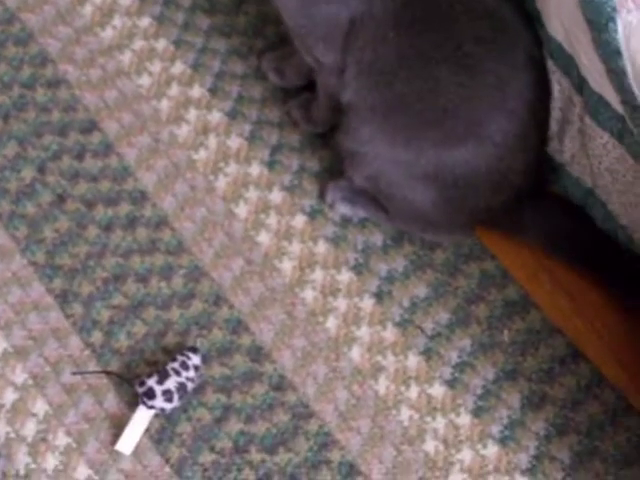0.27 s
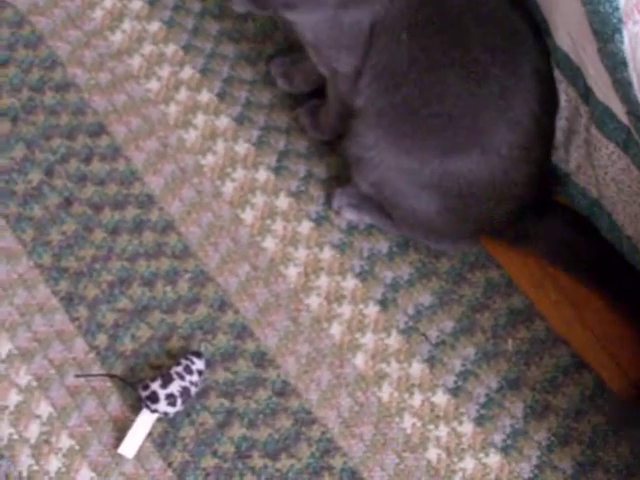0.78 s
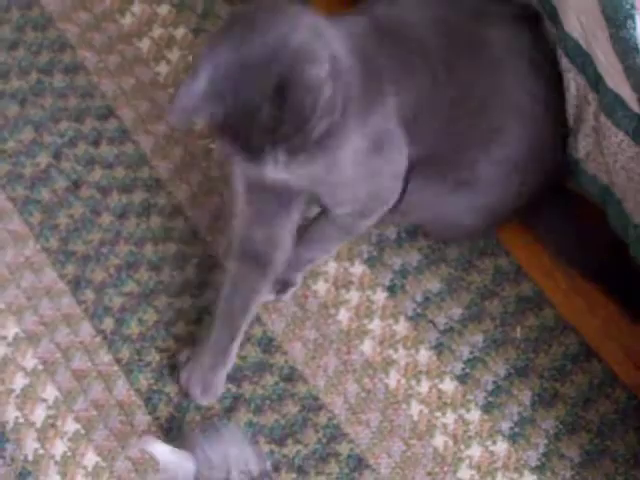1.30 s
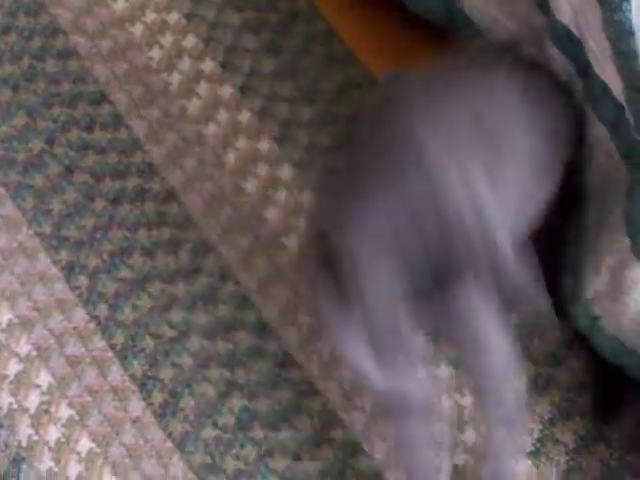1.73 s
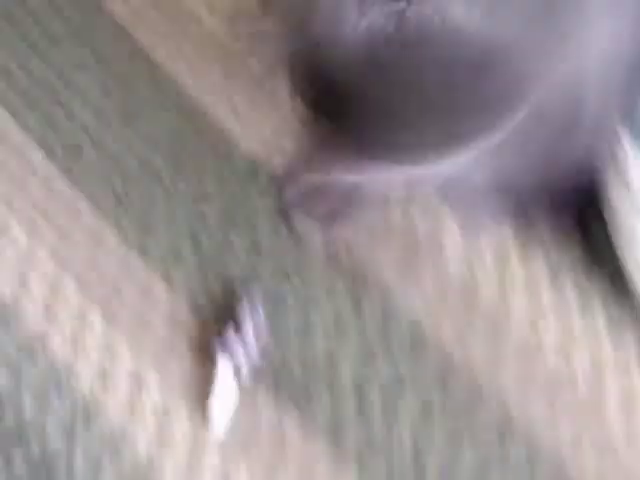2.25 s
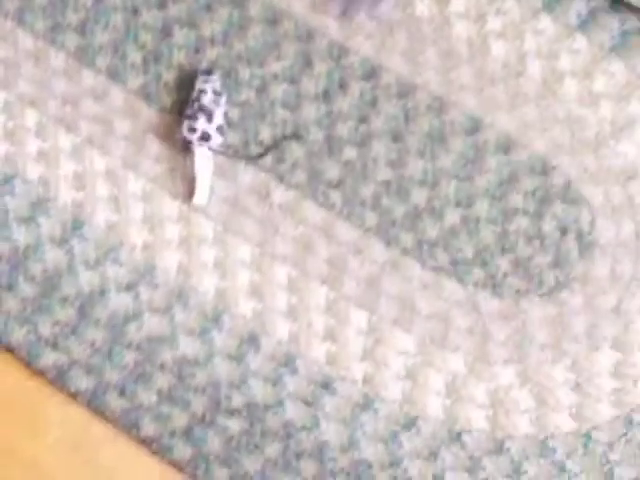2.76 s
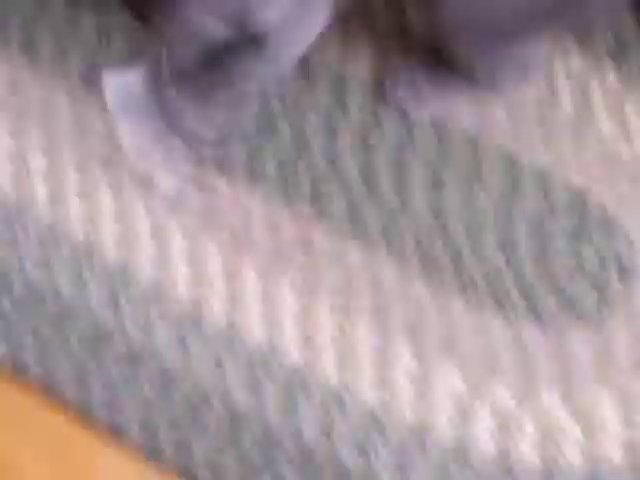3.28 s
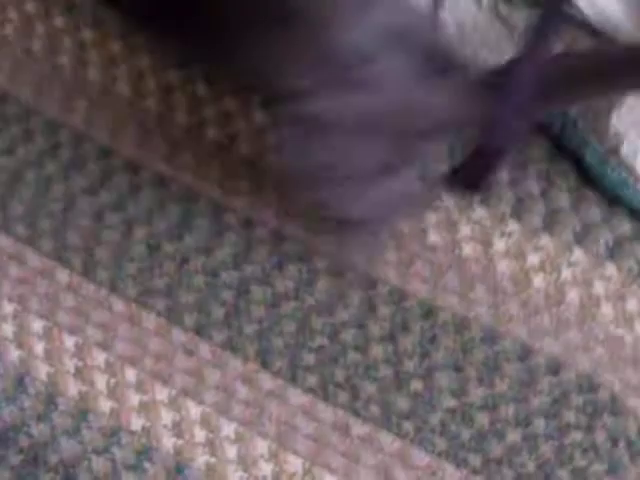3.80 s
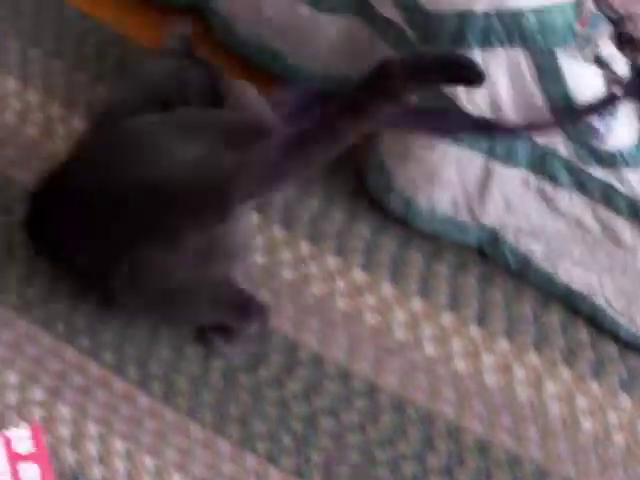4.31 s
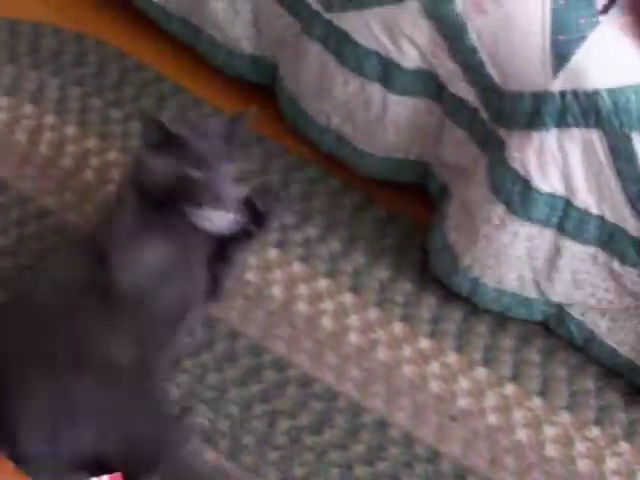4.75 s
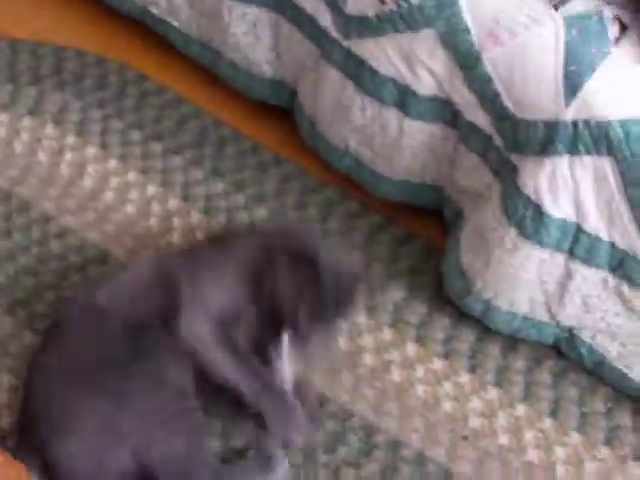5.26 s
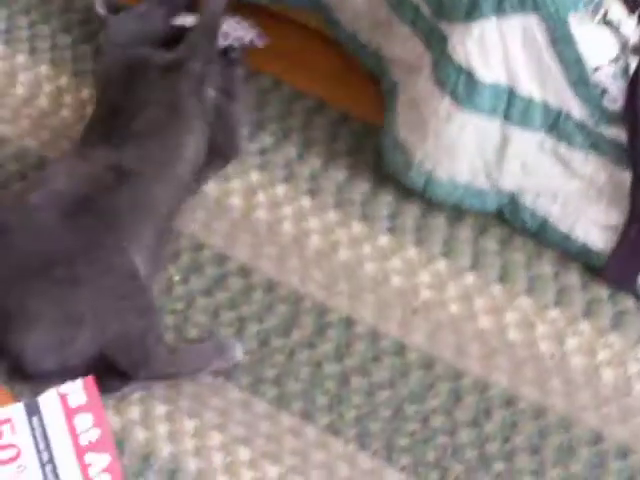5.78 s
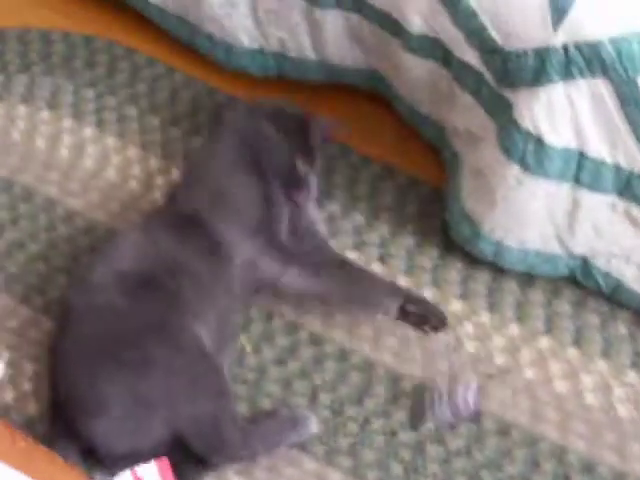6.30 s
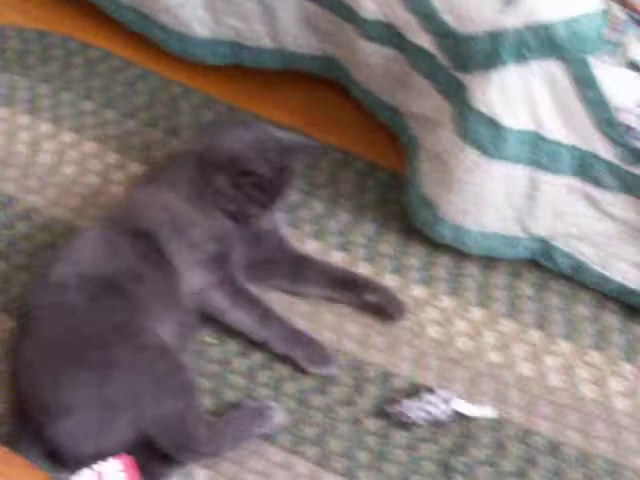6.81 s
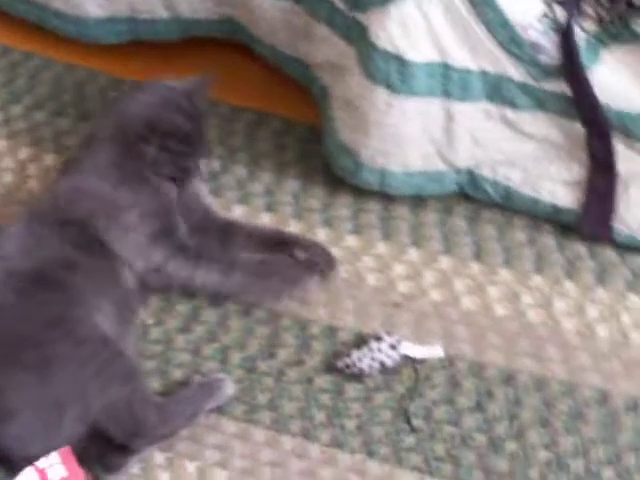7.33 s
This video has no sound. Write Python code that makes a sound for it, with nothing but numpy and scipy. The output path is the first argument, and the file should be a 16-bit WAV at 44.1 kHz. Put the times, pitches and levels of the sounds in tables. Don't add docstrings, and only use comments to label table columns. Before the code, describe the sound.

Close to a small microphone in a furnished bedroom, a cat plays on a braided rug. Faint ticks and soft brushing come first, then claw plucks, scuffs and light thumps on the wooden floor. The toy is struck in a burst of hard, short rattling clacks, the loudest clipping harshly. Afterwards only a few scratches and soft pats remain over low hiss and a faint drone.

```python
import sys
import numpy as np
from scipy import signal
from scipy.fft import rfft, irfft, next_fast_len
from scipy.io import wavfile
from scipy.ndimage import uniform_filter1d, map_coordinates

SR = 44100
rng = np.random.default_rng(int(sys.argv[2]) if len(sys.argv) > 2 else 0)


def master(y):
    cut = np.clip(np.atleast_2d(y).T, -1, 1)
    pcm = np.round(cut * 32767)
    wavfile.write(sys.argv[1], SR, pcm.astype(np.int16))


def nominal_scale(level):
    x = np.asarray(level, float) / 20
    return 10 ** x


N = 332514


def unit(x):
    return x / np.sqrt(np.mean(x ** 2) + 1e-20)


def top1(x):
    return x / np.abs(x).max()


def along(points, hz):
    point_hz, value = np.transpose(points)
    return np.interp(np.log(hz + 1), np.log(point_hz + 1), value)


def curves(rows):
    s, *columns = np.transpose(rows)
    return [np.interp(np.arange(N) / SR, s, column) for column in columns]


def wobble(rate):
    return map_coordinates(rng.standard_normal(N // 20), [np.arange(N) * rate / SR])


def filtered(x, response):
    size = next_fast_len(x.shape[-1] + 4096)
    spectrum = rfft(x, size) * response(np.fft.rfftfreq(size, 1 / SR))
    return irfft(spectrum, size)[..., :x.shape[-1]]


def peak(hz, centre_hz, width_hz):
    return 1j * hz * width_hz / (centre_hz ** 2 - hz ** 2 + 1j * hz * width_hz)


def add(track, s, x):
    track[round(s * SR):][:len(x)] += x


def patchy(depth_db):
    z = signal.stft(rng.standard_normal(N + 512), nperseg=256)[2]
    field = uniform_filter1d(rng.standard_normal(z.shape), 5, 0)
    field = uniform_filter1d(field, 10, 1)
    return signal.istft(z * nominal_scale(depth_db * unit(field)), nperseg=256)[1][:N]


# hz, level_db
BAND_RESPONSE = [(20, -3.5), (6200, -0.5), (7000, -2.5), (7800, -10.5), (8500, -19.5), (9000, -32.5),
                 (9500, -100)]


def narrow_band(hz):
    return nominal_scale(along(BAND_RESPONSE, hz))


# start_s, peak_db, centre_hz
THREAD_TICKS = [(.2554, -34.5, 2830), (.4937, -30.5, 4750), (1.428, -36, 4460), (3.951, -26, 8200),
                (4.0283, -19, 8100), (4.078, -20, 8400), (4.335, -14.5, 4480), (6.875, -45, 6400)]
# start_s, peak_db, centre_hz
THREAD_CRACKS = [(2.1717, -8.5, 3480), (2.1745, -14, 2380), (2.1814, -12.5, 3620), (3.7222, -22, 5260),
                 (3.852, -18, 3630), (7.0147, -29.5, 3050)]
# start_s, peak_db, centre_hz
LOOP_PLUCKS = [(1.372, -22, 4270), (1.3757, -20.5, 4160), (1.4616, -21.5, 4300), (1.624, -26, 3550),
               (1.727, -31, 4000), (2.39, -40, 3530), (3.445, -33, 4460), (3.113, -25, 4140),
               (3.177, -16.5, 4330), (3.5847, -18.5, 3020), (3.597, -33, 3300), (3.6313, -24.5, 4100),
               (5.552, -37.5, 6300), (5.872, -38, 5200), (6.1752, -23, 4000), (6.343, -23, 3470)]
# start_s, peak_db, centre_hz
STRAND_SNAGS = [(1.4758, -26, 4460), (1.4782, -19, 4540), (1.8961, -20.5, 4000), (1.8987, -12.5, 4450),
                (1.9088, -27, 3790), (2.5011, -32.5, 4230), (2.728, -17, 2320), (2.912, -31, 3130),
                (3.1617, -23.5, 4020), (3.1864, -26, 4370), (3.5696, -37, 4030), (3.6164, -26, 3640),
                (3.8995, -27.5, 3700), (3.9061, -19.5, 4200), (4.0196, -5.5, 2530), (4.0902, -20, 3150),
                (4.4, -32.5, 3420), (5.6084, -23.5, 4670), (5.62, -26, 4060), (5.6401, -20, 5300),
                (6.3565, -38, 3440), (6.8734, -35, 4430)]
# start_s, peak_db, centre_hz
CLAW_TEARS = [(2.8943, -29, 3550), (3.0074, -25, 2180), (3.0109, -21.5, 2720), (3.3333, -18, 3290),
              (3.833, -31, 3180), (3.943, -41, 2570), (3.9503, -15, 3330), (3.9569, -20, 2800),
              (4.1265, -38, 2290), (4.67, -26, 4500), (5.6358, -24, 4070), (5.644, -25, 3750),
              (5.6603, -21, 4300), (5.7102, -25.5, 4080), (5.8961, -32, 2620), (5.9308, -30.5, 4700),
              (6.3737, -25.5, 5300)]
# start_s, peak_db, centre_hz
CLAW_SLAPS = [(.2379, -36.5, 1700), (2.1129, -34.5, 1450), (2.7302, -25.5, 1780), (3.215, -24.5, 3180),
              (3.3383, -20, 2740), (4.0161, -14, 2940), (4.243, -34, 1700), (4.3706, -20.5, 1960),
              (4.51, -31.5, 1470), (4.5396, -32.5, 1580), (5.7982, -42, 2760), (6.5024, -29, 2970),
              (7.016, -33, 1270)]
# start_s, peak_db, centre_hz, spread_octaves, t60_s
PAD_PATS = [(.497, -45.5, 4950, 0.083, 0.17), (1.853, -40.5, 2500, 0.19, 0.021),
            (1.891, -36, 4000, 0.44, 0.032), (2.163, -24.5, 3040, 0.47, 0.029),
            (2.6908, -39.5, 3400, 0.4, .07), (3.723, -37, 830, 0.4, 0.14), (4.171, -27.5, 1910, .3, 0.033),
            (4.337, -18, 1900, .55, 0.062), (4.7918, -27.5, 2620, 1, 0.024), (6.093, -38, 3100, 0.33, .05),
            (4.225, -34.5, 4700, .15, .12), (6.504, -41.5, 1100, 0.65, .06), (7.38, -50.5, 6600, .02, .15)]


def claws():
    # spread_octaves, t60_s, pad_knock_db
    kinds = [
        (THREAD_TICKS, (0.091, 0.008, -40)),
        (THREAD_CRACKS, (0.38, 0.0021, -10.5)),
        (LOOP_PLUCKS, (0.29, 0.0046, -30)),
        (STRAND_SNAGS, (0.51, 0.0077, -24)),
        (CLAW_TEARS, (1, 0.0073, -16.5)),
        (CLAW_SLAPS, (0.35, 0.01, -6.5)),
        (PAD_PATS, (-8.5,)),
    ]
    rows = [tuple(row) + shared for table, shared in kinds for row in table]
    out, t = np.zeros(N + SR), np.arange(2048) / SR
    rise = 1 - np.exp(-t / 0.00015)
    release = 5.5 * (np.arange(len(t)) == 12)
    for s, db, hz, spread, t60, knock_db in rows:
        crackle, thud = rng.standard_normal((2, len(t)))
        crackle = crackle * rise * nominal_scale(-60 * t / (1.84 * t60))
        thud = thud * rise * nominal_scale(-60 * t / (4.7 * t60))
        snap = filtered(release + crackle, lambda f: peak(f, hz, 2.45 * hz * spread) ** 2)
        knock = filtered(thud, lambda f: peak(f, 882, 1120) ** 2)
        add(out, s, nominal_scale(db) * (top1(snap) + nominal_scale(knock_db - 5.0) * top1(knock)))
    return out[:N]


# peak_s, level_db, rise_20db_s, fall_20db_s, dullness_db (the sign of a time is ignored)
QUICK_SWIPES = [(.615, -50.5, 0.4, 0.2, 8), (1.354, -41.5, 0.05, 0.11, 1.5), (1.473, -47.5, 0.21, 0.1, -2),
                (1.578, -48.5, 0.13, 0.36, 1.5), (1.718, -39, 0.05, 0.07, -3),
                (1.905, -38.5, 0.03, 0.08, -2), (2.176, -32, -0.01, 0.05, -3.5),
                (2.8, -45.5, 0.16, 0.1, -9), (3.11, -36.5, 0.01, 0.02, -4.5), (3.18, -35.5, .09, 0.07, 2.5),
                (3.601, -44, 0.07, -0.2, 6), (3.901, -43.5, 0.28, -0.52, 6), (3.973, -39, -0.06, -0.04, -5),
                (4.05, -28.5, 0.06, 0.0466, -3.5), (4.213, -37, -0.13, 0.06, -10),
                (5.235, -50.5, 0.34, 0.36, -3.5), (6.101, -59, 0.3, -1.1, 24), (6.194, -55, 0.45, 0.3, -7),
                (6.345, -52, -0.12, .15, -5), (6.512, -56, 0.3, 0.5, 4), (7.305, -52, 0.17, 0.4, 4.5)]
# peak_s, level_db, rise_20db_s, fall_20db_s, dullness_db
FURTHER_SWIPES = [
    (4.336, -33, .005, .05, 3),
    (4.829, -27, .028, .008, -12),
    (4.81, -40, .006, .04, -12),
]
# start_s, hold_s, level_db, dullness_db, fall_20db_s
HELD_DRAGS = [(0.269, 0.081, -48, 0.5, 0.1), (1.006, 0.23, -55.5, -1.5, -0.3), (1.783, 0.053, -59.5, 3, -3),
              (1.985, 0.048, -44, -12.5, 0.05), (2.116, 0.037, -50, 2, .1), (2.948, 0.038, -44, -7, .05),
              (3.008, 0.055, -46, -2, 0.1), (3.35, 0.044, -39.5, -2.5, .12),
              (3.403, 0.061, -46.5, -3.5, 0.13), (4.033, 0.021, -36.5, -0.5, 0.32),
              (4.359, 0.034, -51, -2, 0.34), (4.893, 0.057, -47.5, -5, 0.1),
              (5.603, 0.048, -48, -0.5, 0.25), (6.58, 0.061, -54, 7, 0.14)]
# start_s, level_db
FUR_FIDGET = [(0, -62), (.22, -66), (.95, -70), (1.3, -62), (2.1, -64), (2.25, -51), (2.37, -56),
              (2.61, -51.5), (2.9, -49.5), (3.27, -57.5), (3.7, -52.5), (3.87, -49.5), (4.43, -58),
              (4.55, -52), (4.78, -53.5), (5.0, -69), (5.55, -53), (5.9, -66)]


def strokes():
    drag_rise_s, fidget_dull_db = 0.036, 0.3
    t = np.arange(0, N, 32) / SR
    rows = [(s, 0, db, dull, rise, fall) for s, db, rise, fall, dull in QUICK_SWIPES + FURTHER_SWIPES]
    rows += [(s, hold, db, dull, drag_rise_s, fall) for s, hold, db, dull, fall in HELD_DRAGS]
    s, hold, db, dull_db, rise, fall = np.transpose(rows)[..., None]
    before = (s - t) / abs(rise)
    after = (t - s - hold) / abs(fall)
    power = nominal_scale(2 * (db - 20 * np.maximum(0, np.maximum(before, after))))
    rest = nominal_scale(2 * np.interp(t, *np.transpose(FUR_FIDGET)))
    total = power.sum(0) + rest
    dullness_db = ((power * dull_db).sum(0) + rest * fidget_dull_db) / total
    return curves(np.transpose([t, 10 * np.log10(total), dullness_db]))


# hz, density_db (per Hz)
WEAVE_COLOUR = [(60, -38), (170, -6.5), (300, -16.5), (800, -15), (1500, -13), (2100, -11), (2700, -7.5),
                (3500, -7.5), (4200, -5), (4700, -4), (5400, -5.5), (6500, -10.5), (7500, -2), (10000, 13)]


def scuffs():
    level_db, dull_db = strokes()
    bunches_db = 2.3 * wobble(900) + 0.9 * wobble(90)
    slips = patchy(depth_db=1.8) * nominal_scale(bunches_db)
    weave = unit(filtered(slips, lambda f: nominal_scale(along(WEAVE_COLOUR, f)) * narrow_band(f)))
    low = filtered(weave, lambda f: 1 / (1 + (f / 3300) ** 4))
    tilt = nominal_scale(dull_db + 4.5)
    even = np.sqrt(0.44 + 0.5 * tilt ** 2)
    return nominal_scale(level_db) * (tilt * low + weave - low) / even


# start_s, peak_db, shell_ring_hz, tilt_db (per octave), contact_s
TOY_TAPS = [(4.0282, -2.5, 4800, -0.5, 0.0003), (4.078, -8.5, 4900, -2.5, .00072),
            (4.2137, -10, 4570, -7, 0.0021), (4.3298, -13, 4480, -5, 0.00031),
            (4.3355, -10.5, 4420, -7.5, 0.0005), (4.4906, -4, 2020, -1.5, 0.0013),
            (4.6984, -5, 1880, 2.5, 0.0013), (4.794, -14, 1744, -7.5, 0.0025),
            (4.829, -6.5, 2220, 2.5, 0.0013), (4.8333, 9.5, 2094, 4, .0012)]
# hz, level_db, t60_s
SHELL_MODES = [(690, -15, 0.01), (1287, -14.5, 0.03), (2606, 0, 0.013), (3550, 1.5, 0.0048),
               (4300, -5.5, 0.0038), (4900, -0.5, 0.0062), (5890, -1, 0.0033), (6634, -1, 0.0037),
               (8100, -12.5, 0.0018)]


def taps():
    out, t = np.zeros(N + SR), np.arange(2048) / SR
    for s, db, ring_hz, tilt_db, contact in TOY_TAPS:
        held = np.maximum(t - abs(contact), 0)
        shake = np.cumsum(rng.standard_normal(len(t))) * 0.12
        ring = 0
        for hz, level_db, t60 in SHELL_MODES + [(ring_hz, 1.5, 0.011)]:
            strength = nominal_scale(level_db + tilt_db * np.log2(hz / 3000) - 60 * held / t60)
            ring = ring + strength * np.sin(2 * np.pi * (hz * t + rng.random()) + shake)
        add(out, s, nominal_scale(db) * top1(ring * (1 - np.exp(-t / 0.00025))))
    return filtered(out[:N], lambda f: 1 / (1 - 1j * 450 / (f + 1)) ** 2)


# start_s, peak_db, board_hz, boom_db
LANDINGS = [(.223, -53.5, 249, 2), (1.471, -60.5, 293, 13), (1.859, -46.5, 299, -1),
            (1.948, -39.5, 161, -2), (2.111, -26, 186, 0), (2.169, -37.5, 129, 2.5),
            (2.697, -41.5, 195, -4), (2.744, -29.5, 206, 0.8), (3.004, -30, 250, 1.5),
            (3.023, -32.5, 272.5, 6.5), (3.947, -24.5, 138.4, -4), (4.207, -48, 183, 9.5),
            (5.649, -63, 127, 16), (5.708, -48, 234, -0.5), (6.328, -51.5, 262, 9)]
# start_s, peak_db, board_hz, boom_db
WEIGHT_SETTLES = [(1.893, -40.5, 200, 0), (2.459, -52.5, 205.5, -13), (3.15, -49.5, 199.5, 7),
                  (3.397, -43, 196, -7), (3.619, -54, 160, 5), (3.72, -57.5, 328, 15),
                  (4.025, -30, 195, -5), (4.045, -23, 212.5, -8), (4.321, -51.5, 318, 5),
                  (4.831, -66, 230, -14.5), (6.497, -50.5, 311, -3)]
# start_s, peak_db, board_hz, boom_db, t60_s
TOE_KNOCKS = [(2.112, -50.5, 474, -16, 0.053), (2.727, -27.5, 451, -2.5, .045), (3.002, -30, 630, 1, 0.012),
              (3.949, -36, 600, -7, 0.033), (4.333, -37, 465, -30, .11), (4.371, -38.5, 504, -24, 0.06),
              (4.491, -37, 212, -9.5, .059)]
# hz, density_db (per Hz)
JOIST_BOOM = [(20, -11.5), (55, -6), (130, -4.5), (300, -13.5), (600, -27.5), (1200, -39)]


def paws():
    out, t = np.zeros(N + SR), np.arange(SR // 2) / SR
    rows = [tuple(row) + (0.11, 0.0039) for row in LANDINGS]
    rows += [tuple(row) + (0.24, 0.0039) for row in WEIGHT_SETTLES]
    rows += [tuple(row) + (0.0004,) for row in TOE_KNOCKS]
    rows += [(3, -42, 30, -5, 0.3, 1)]
    for s, db, hz, boom_db, t60, rise in rows:
        load, rumble = rng.standard_normal((2, len(t)))
        shape = (1 - np.exp(-t / rise)) ** 2 * nominal_scale(-60 * t / t60)
        drift = np.cumsum(np.cumsum(load)) * 2e-6
        board = np.sin(2 * np.pi * hz * t + drift)
        boom = unit(filtered(rumble, lambda f: nominal_scale(along(JOIST_BOOM, f))))
        boom = boom * nominal_scale(25 * t / t60)
        add(out, s, nominal_scale(db) * (top1(shape * board) + nominal_scale(boom_db) * shape * boom))
    return out[:N]


# hz, t60_s
BEDROOM_DECAY = [(200, 0.62), (1000, 0.28), (4000, 0.023), (9000, 0.07)]


def room(x):
    hz, t, z = signal.stft(rng.standard_normal(SR // 2), SR, nperseg=256)
    decay = nominal_scale(-60 * t / along(BEDROOM_DECAY, hz)[:, None])
    tail = signal.istft(z * decay, SR, nperseg=256)[1]
    late = np.pad(x, (200, 0))
    return signal.fftconvolve(late, tail / np.linalg.norm(tail))[:N]


# start_s, level_db
DISTANT_DRONE = [(0, -67), (.9, -75), (1.0, -57), (1.25, -55), (1.4, -68), (2.4, -67), (2.55, -56),
                 (3.3, -70.5), (3.7, -63.5), (4.2, -49.5), (4.6, -65), (5.6, -70), (5.85, -55), (6.4, -57),
                 (6.65, -72.5), (6.9, -57), (7.25, -78), (7.54, -48)]
# hz, density_db (per Hz)
AIR_HISS = [(20, 9.5), (60, 8.5), (150, 7.5), (300, 6.5), (600, 1.5), (1200, -2.5), (2000, -7), (4000, -8),
            (6000, -9.5), (9000, -7)]


def room_tone():
    drone_db, = curves(DISTANT_DRONE)
    drone_db = drone_db + 1.1 * wobble(15)
    rumble_db = -77.5 + 2.7 * wobble(2.7)
    hiss = unit(filtered(patchy(depth_db=-0.9), lambda f: nominal_scale(along(AIR_HISS, f))))
    drone = unit(filtered(patchy(depth_db=2), lambda f: peak(f, 335, 160) ** 2))
    rumble = unit(filtered(rng.standard_normal(N), lambda f: peak(f, 55, 120) ** 2))
    return nominal_scale(-52.5) * hiss + nominal_scale(drone_db) * drone + nominal_scale(rumble_db) * rumble


def scene():
    near, toy = claws() + paws(), taps()
    echo = nominal_scale(-17) * room(near + nominal_scale(-14.0) * toy)
    return (near + toy + echo + scuffs() + room_tone())[None]


def top_cut(x):
    return signal.sosfilt(signal.butter(12, 16020, fs=SR, output="sos"), x)


def record(dry):
    heard = filtered(np.clip(dry, -0.73, 0.73), narrow_band)
    mix = filtered(np.clip(heard, -0.74, 0.74), lambda f: 1 / (1 + (f / 15700) ** 80))
    return top_cut(mix)


dry = scene()
out = record(dry)
master(out)
```